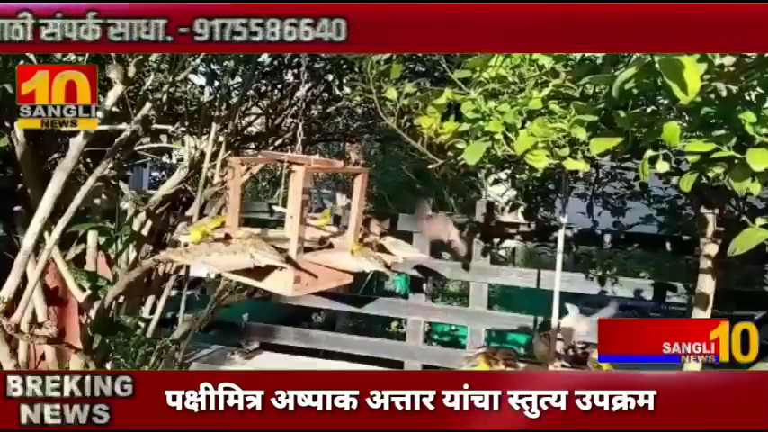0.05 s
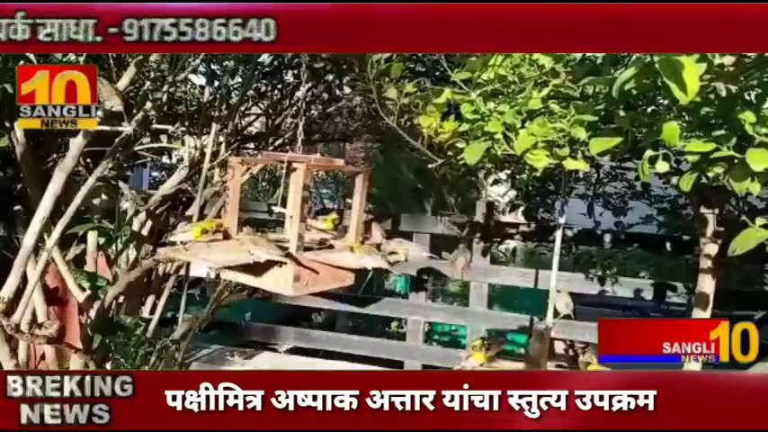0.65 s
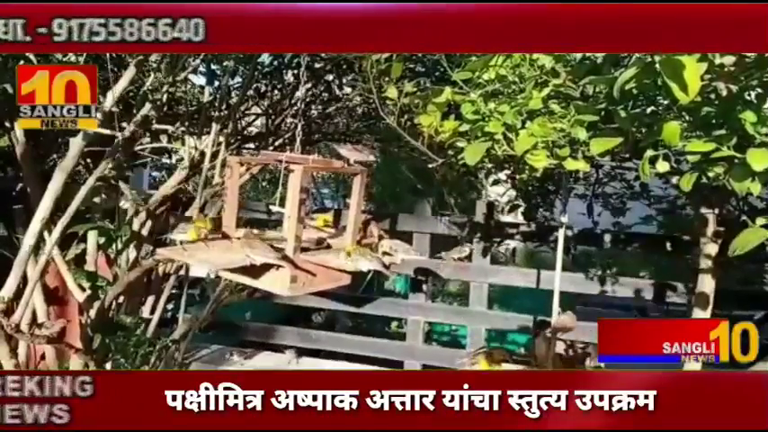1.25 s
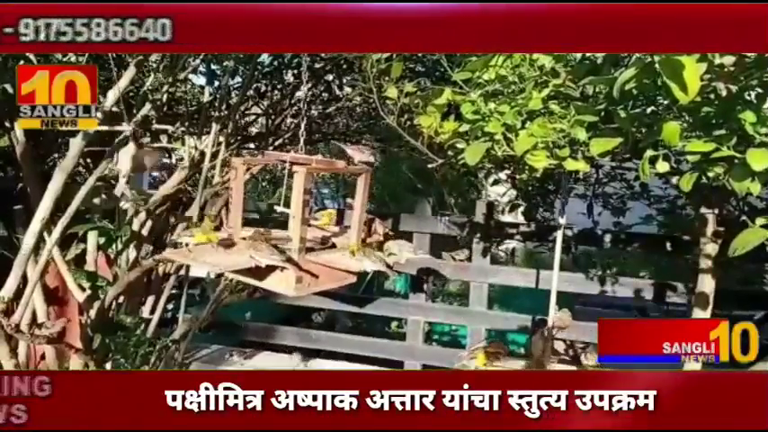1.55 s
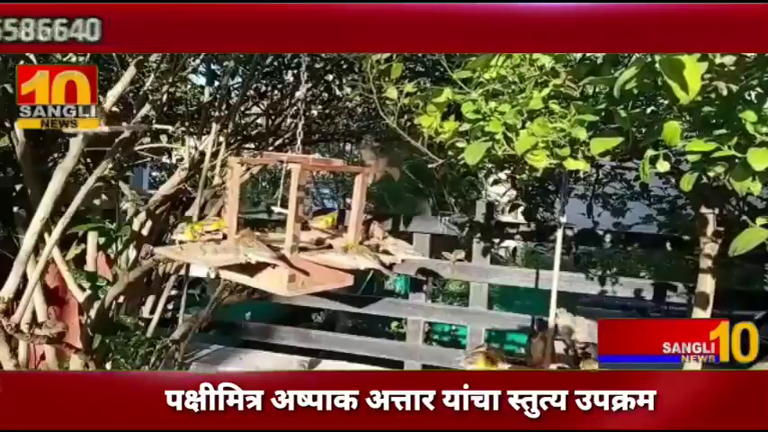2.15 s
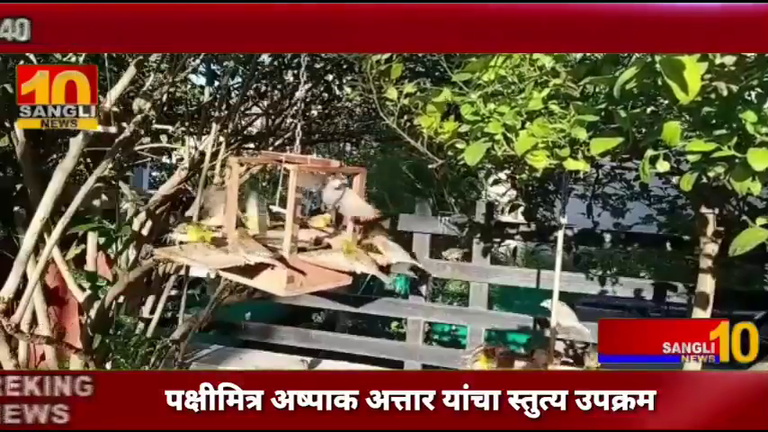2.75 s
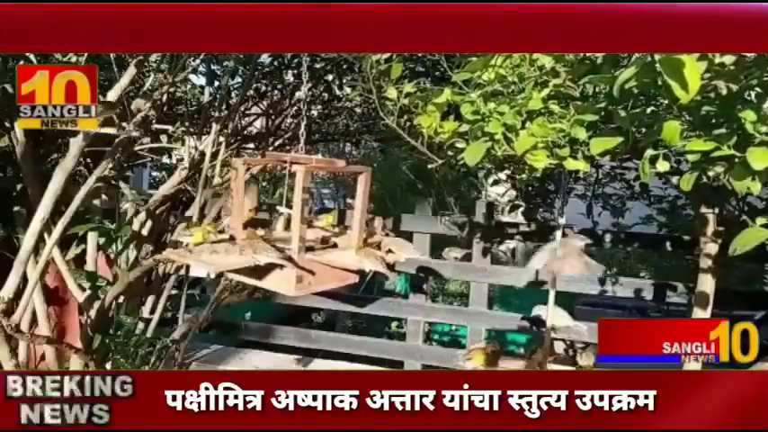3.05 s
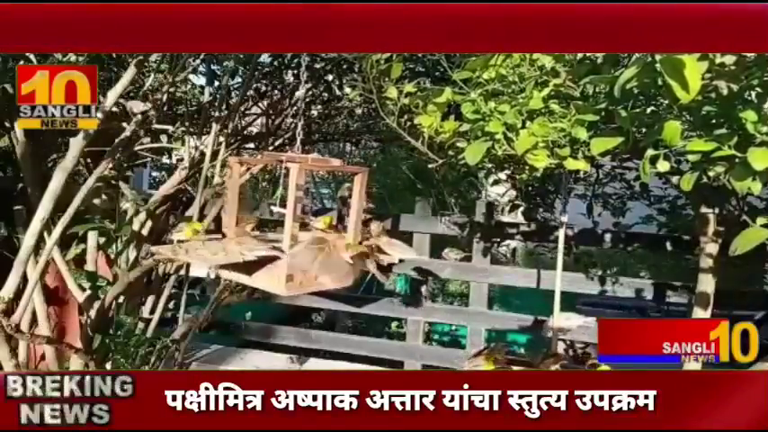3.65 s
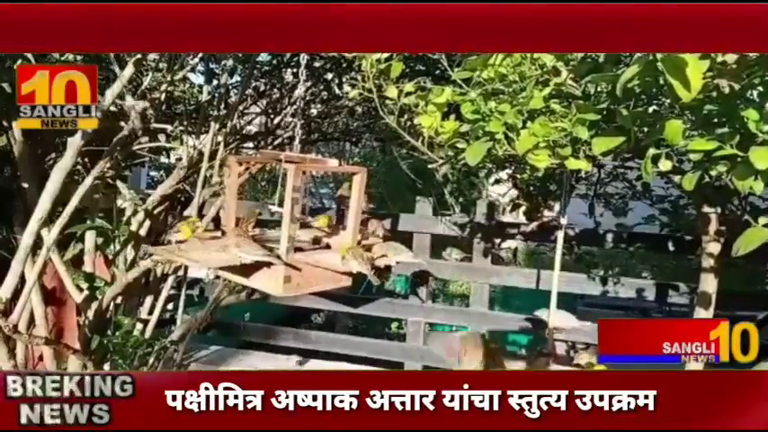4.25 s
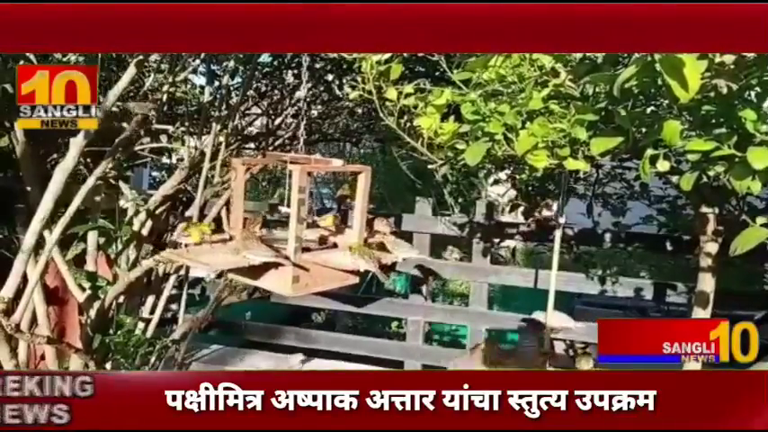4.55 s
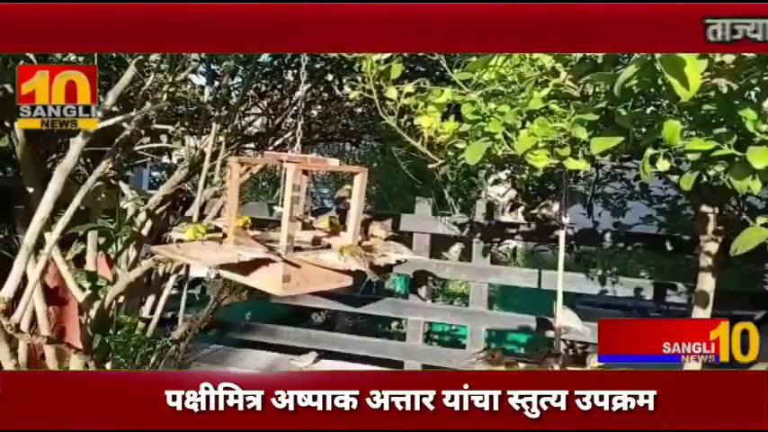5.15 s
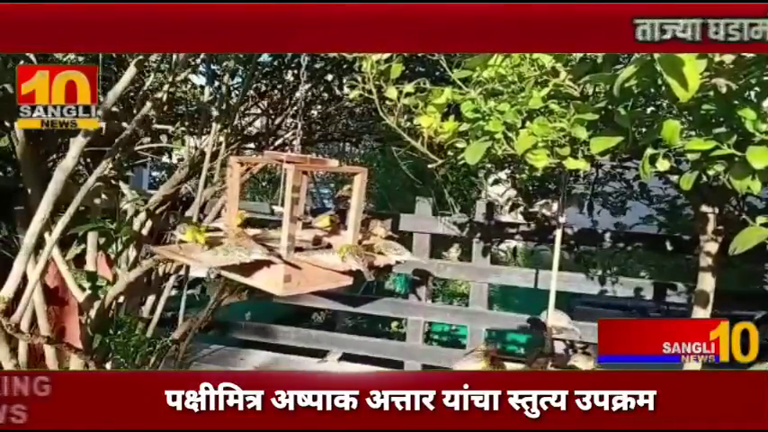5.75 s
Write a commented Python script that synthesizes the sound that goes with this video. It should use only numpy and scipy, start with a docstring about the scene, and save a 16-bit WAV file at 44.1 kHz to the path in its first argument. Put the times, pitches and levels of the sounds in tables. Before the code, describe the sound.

Small birds squabble at a garden feeder, heard from fairly near and straight ahead. They open with harsh rasps and trills, ease into softer falling chirps, then quarrel again. Seed husks snap crisply past the middle, three sharp calls follow, and the chatter ends at its loudest. Soft wing flutters and faint distant whistles sit over a quiet hush of leaves.

```python
"""Weaver birds squabble at a garden feeder. Over a hush and the whistles of far birds, the scene opens with
rasps and trills, tones of the syrinx made harsh by modulation, and wings that push puffs of air.
Softer down-slurs follow, and from 2.4 s the quarrel grows. Near 3.5 s beaks crack seed, each husk ringing
briefly; three sharp chacks come next, and from 4.6 s slurs, chips and rasps crowd in at their loudest.
Throughout, the feeder, ground, fence and walls reflect the calls and clicks."""
import sys
import numpy as np
from scipy import signal
from scipy.fft import rfft, irfft
from scipy.io import wavfile
from scipy.ndimage import uniform_filter1d

SR = 44100
rng = np.random.default_rng(int(sys.argv[2]) if len(sys.argv) > 2 else 0)


def unload_audio(sound):
    """Save the sound as a 16-bit wav file, at the path given as the first command line argument."""
    columns = np.transpose(np.atleast_2d(sound))
    # keep every value between -1 and 1, then stretch to whole-number steps
    steps = np.round(np.clip(columns, -1, 1) * 32767)
    wavfile.write(sys.argv[1], SR, steps.astype(np.int16))


N = 263718

# Levels in the tables are relative: filters and mixing gains act on them later.
# hush of leaves and distance: frequency_hz, density_db
HUSH_SPECTRUM = [(100, -12.5), (170, -10.5), (300, -7.5), (600, -11), (1100, -3), (1650, -8), (2100, -15),
                 (3500, -11), (5000, -14), (7000, -12.5), (9000, -31), (11500, -30.5), (14000, -13.5),
                 (15800, -25)]
# course of the hush: time_s, level_db
HUSH_LEVELS = [(0.0, -60.5), (0.37, -56.5), (0.6, -63), (3.51, -58), (4.38, -62), (5.11, -59),
               (5.98, -59.5)]
# likeness of the hush left and right: frequency_hz, coherence
HUSH_COHERENCE = [(50, 0.72), (250, 0.99), (600, 0.99), (1200, 0.59), (2500, 1), (15000, 1)]
# stirring air: frequency_hz, density_db
AIR_SPECTRUM = [(15, -56), (25, -29), (52, -7), (75, 6), (140, -3), (173, -6), (227, -48), (300, -28),
                (390, -68), (660, -120)]
# course of the stirring air: time_s, level_db
AIR_LEVELS = [(0.0, -64), (0.3, -65), (2.51, -70), (2.65, -73), (4.15, -64.5), (4.35, -56.5), (5.18, -59.5),
              (5.63, -63), (5.98, -55)]
# reverberation of the garden: frequency_hz, t60_s
GARDEN_DECAY = [(200, 0.12), (1000, 0.76), (3500, 0.37), (7000, 0.6), (15000, 0.38)]
# reflections from feeder roof, tray, ground and fence: delay_s, gain_db
REFLECTIONS = [(.0013, -43), (.0034, -18), (.0068, -12.5), (0.01, -10), (0.02, -13), (0.029, -12.5)]
# rightward lean of the surroundings: frequency_hz, left_minus_right_db
BALANCE = [(300, 0.5), (700, -3.5), (1300, -10), (2400, -4)]
# distant whistles: start_s, length_s, level_db, start_hz, end_hz
FAR_WHISTLES = [(0, 0.066, -52, 1143, 1130), (.243, 0.32, -55, 1281, 1075), (.86, 0.098, -60.5, 1161, 1049),
                (.897, 0.092, -60.5, 2177, 2070), (1.045, 0.13, -56, 997, 999),
                (1.775, .062, -65, 1268, 1200), (1.863, 0.14, -60, 1600, 1756),
                (2.18, 0.32, -64.5, 1160, 955), (3.05, 0.25, -58.5, 1295, 1065),
                (3.3, 0.1255, -52, 1060, 1230), (3.56, 0.186, -68, 1140, 1190),
                (4.026, 0.086, -62, 1200, 1300), (5.48, 0.078, -50.5, 734, 714),
                (5.596, .11, -59.5, 976, 1017), (5.837, 0.058, -54.5, 712, 683)]
# birds flying past: start_s, length_s, peak_db
FLYBYS = [(0.164, 0.16, -49), (1.294, 0.1356, -61), (1.661, 0.31, -62.5), (3.424, 0.182, -58.5),
          (3.693, 0.058, -58), (4.249, 0.144, -60), (4.491, 0.26, -48.5), (4.869, 0.72, -57.5)]
# feathers rubbing as birds land and jostle: start_s, length_s, level_db, centre_hz
FEATHER_SCUFFS = [(.279, 0.038, -55.5, 320), (1.135, 0.094, -63.5, 680), (1.741, 0.056, -57, 1190),
                  (2.502, 0.083, -51, 856), (3.32, 0.12, -59, 127), (3.533, 0.073, -56, 600),
                  (4.155, 0.084, -55.5, 580), (4.66, 0.1, -59, 143.5), (5.124, 0.073, -65, 315),
                  (5.462, 0.085, -61, 308)]
# husks snapping: start_s, level_db, ring_hz, t60_s
SEED_CRACKS = [(0.6865, -36, 6340, 0.023), (1.033, -39, 6850, 0.017), (2.101, -41, 3880, 0.018),
               (2.196, -37, 14000, .02), (2.417, -26, 13500, .027), (3.36, -19, 14200, .01),
               (3.401, -16.5, 6900, 0.0054), (3.4848, -18, 5960, 0.054), (3.5802, -17.5, 7000, 0.0057),
               (3.6232, -25.5, 14500, 0.023), (3.703, -29.5, 15200, 0.12), (4.458, -35, 6400, 0.035),
               (4.488, -21, 15200, 0.017), (5.7352, -26.5, 3605, 0.048)]
# colour of breath and of cracking husks: frequency_hz, gain_db
HISS_SPECTRUM = [(300, -14), (1000, -7), (2000, -6), (3500, -7), (7000, -4), (9000, -9), (11500, -6),
                 (13000, 3), (14800, 9), (15800, 8)]
# tone colour of the calls (full middle, dip near 9 kHz, bright top): frequency_hz, gain_db
VOICE_COLOUR = [(500, -28), (1200, -1), (1800, -7), (2300, -4), (4500, -0.5), (6800, -3), (8000, -10.5),
                (9300, -18.5), (11500, -13), (14500, 3)]
# short clear chips: start_s, length_s, level_db, top_hz
CHIP_NOTES = [(0.446, 0.017, -31, 3510), (1.001, 0.015, -55, 3660), (2.849, 0.02, -27, 4970),
              (3.102, 0.024, -33.5, 4520), (3.115, 0.035, -30.5, 3670), (3.249, 0.016, -29.5, 4710),
              (4.797, .016, -15.5, 5600), (4.863, 0.01, -18, 3616), (5.247, 0.028, -19, 4050),
              (5.351, 0.0209, -19.5, 3794), (5.485, 0.024, -29, 3950), (5.535, 0.019, -26.5, 3870),
              (5.762, 0.013, -24.5, 3830), (5.814, 0.0165, -20.5, 6320), (5.821, 0.021, -24.5, 3970)]
# lone sharp chacks: start_s, level_db, top_hz
CHACK_CALLS = [(3.986, -28, 3253), (4.305, -27.5, 3520), (4.58, -24.5, 3750)]
# whistled down-slurs: start_s, length_s, level_db, top_hz, end_hz, following_trill_s
SLUR_CALLS = [(1.354, 0.041, -35, 4360, 3320, 0), (1.489, 0.056, -30.5, 4350, 3574, 0),
              (1.655, 0.045, -35.5, 4450, 3430, 0), (2.525, .04, -23.5, 3920, 2347, 0),
              (3.137, 0.055, -29.5, 4670, 2694, 0), (4.62, 0.038, -21, 5020, 2338, .071),
              (4.805, 0.039, -21.5, 5300, 2740, .083), (4.826, 0.035, -23, 7160, 5280, 0),
              (5.006, 0.044, -21, 5500, 2480, .056), (5.108, 0.016, -16.5, 4060, 2800, 0),
              (5.259, 0.023, -21.5, 4100, 2630, .06)]
# sinking trills: start_s, length_s, level_db, top_hz, overtone_db
TRILL_NOTES = [(0.265, .054, -23.5, 3593, -2), (0.37, 0.075, -33, 3550, -29),
               (0.657, 0.025, -50, 2265, -28), (1.497, 0.058, -32.5, 2750, -3),
               (1.658, 0.055, -37.5, 2770, -7), (2.247, 0.059, -51.5, 3550, -30),
               (2.697, .048, -27.5, 4190, -11.5), (2.732, 0.06, -25.5, 4150, -14),
               (2.983, .05, -29, 3356, -7), (4.744, 0.048, -21.5, 3070, -7)]
# harsh rasps: start_s, length_s, level_db, top_hz, overtone_db, roughness
RASP_CALLS = [(0.113, 0.038, -28.5, 3220, -0.5, 0.63), (0.204, 0.043, -29, 3640, -10, 0.56),
              (0.225, 0.046, -23, 3302, -3, 0.56), (0.318, 0.039, -24.5, 3853, -10, 0.6),
              (0.482, 0.03, -25.5, 3573, 0, .62), (1.148, 0.029, -50, 3220, -1, 0.6),
              (1.286, .046, -33, 2890, -7, .46), (1.377, 0.061, -32.5, 3506, -9, 0.56),
              (1.466, 0.027, -31.5, 2917, -6, 0.54), (1.597, 0.012, -39.5, 3030, 3, 1.1),
              (1.733, 0.027, -42.5, 2885, -4, 1.07), (1.938, 0.0224, -46, 3336, -6, .65),
              (2.414, 0.0208, -32, 3750, -15, .45), (2.436, .085, -29.5, 3726, -7.5, 0.76),
              (2.622, 0.036, -26.5, 3423, -13.5, 0.61), (2.86, 0.072, -24.5, 3640, -3.5, 0.58),
              (3.017, 0.037, -29, 3446, 8, 0.34), (3.105, 0.048, -29, 3050, -5.5, 0.33),
              (3.255, 0.064, -28, 3373, 4, 0.7), (3.312, 0.12, -44, 3470, 4, 1.2),
              (4.963, 0.046, -19, 4264, -7, 0.44), (5.12, 0.027, -27, 3490, 14, .95),
              (5.148, 0.029, -20, 3475, -1, 0.39), (5.17, 0.075, -26, 3860, -5.5, 0.76),
              (5.372, 0.016, -22.5, 3900, -5.5, 0.69), (5.493, 0.053, -30.5, 3384, -5, 0.45),
              (5.771, 0.048, -21, 4065, 0, .56)]

# Note shapes; ratios are to the top pitch, and top_place is a share of the note's length:
# start_ratio, end_ratio, top_place, trill_hz, trill_depth, roughness
CHIP_SHAPE = (0.94, 0.946, 0.545, 114, 0.037, 0.16)
CHACK_SHAPE = (0.72, 0.92, 0.667, 103, 0.052, 0.29)
TRILL_SHAPE = (0.98, 0.84, 0.1565, 68, 0.1782, 0.28)
LEAD_IN_SHAPE = (0.72, 0.84, 0.92, 105, 0.0098, 0.41)
RASP_SHAPE = (0.9, 0.82, 0.379, 72, 0.0775)  # each call adds its roughness
SLUR_SHAPE = (0.1052, 80, 0.042, 0.28)  # each call supplies the two ratios

BAND_EDGE_HZ = 15520


def gain_of(db):
    """The decibel law: 20 dB is a factor of ten in amplitude."""
    return 10 ** (np.asarray(db) / 20)


def unit_rms(x):
    """Normalisation to unit mean power."""
    return x / np.sqrt(np.mean(x ** 2) + 1e-20)


def at_frequency(points, hz):
    """Interpolation of a table on a logarithmic frequency axis."""
    table_hz, value = np.transpose(points)
    return np.interp(np.log(hz + 1), np.log(table_hz + 1), value)


def over_time(points):
    """Linear interpolation of a table at every sample."""
    return np.interp(np.arange(N) / SR, *np.transpose(points))


def add(mix, start_s, sound):
    """Superposition: a sound sums into the mix from start_s on."""
    part = mix[max(round(start_s * SR), 0):][:len(sound)]
    part += sound[:len(part)]


def coloured(x, points):
    """Linear filtering: the spectrum is multiplied by a gain curve."""
    return irfft(rfft(x) * gain_of(at_frequency(points, np.fft.rfftfreq(N, 1 / SR))), N)


def noise(spectrum):
    """Spectral shaping of white noise, at unit power."""
    return unit_rms(coloured(rng.standard_normal(N), spectrum))


def wander(cutoff_hz):
    """Low-pass filtered noise: a smooth random fluctuation of unit power."""
    rolloff = 1 + (np.fft.rfftfreq(N, 1 / SR) / cutoff_hz) ** 4
    return unit_rms(irfft(rfft(rng.standard_normal(N)) / rolloff, N))


def fade(t, length_s, rise_s, fall_s):
    """An amplitude envelope with sine-squared attack and release."""
    attack = np.sin(np.pi / 2 * np.clip(t / rise_s, 0, 1)) ** 2
    release = np.sin(np.pi / 2 * np.clip((length_s - t) / fall_s, 0, 1)) ** 2
    return attack * release


def hush(patch_db=3.2):
    """Partial coherence: leaves and distance give a patchy noise, largely alike left and right."""
    frames, hz = N // 256 + 5, np.fft.rfftfreq(1024, 1 / SR)
    a, b, c, d, patches = rng.standard_normal((frames, len(hz), 5)).T
    left, independent = a + 1j * b, c + 1j * d
    coherence = np.clip(at_frequency(HUSH_COHERENCE, hz), -1, 1)[:, None]
    right = coherence * left + np.sqrt(1 - coherence ** 2) * independent
    patches = uniform_filter1d(patches, size=7, axis=0)  # smooth across frequency, then time
    patches = unit_rms(uniform_filter1d(patches, size=14, axis=1))
    colour = gain_of(at_frequency(HUSH_SPECTRUM, hz)[:, None] + patch_db * patches)
    stereo = signal.istft(np.array([left, right]) * colour, nperseg=1024, noverlap=768)[1][:, :N]
    return gain_of(over_time(HUSH_LEVELS) + 2) * unit_rms(stereo)


def stirring_air(gust_hz=2, gust_db=2.5):
    """Slow amplitude modulation: small gusts swell a low rumble."""
    return gain_of(over_time(AIR_LEVELS) - 1 + gust_db * wander(gust_hz)) * noise(AIR_SPECTRUM)


def garden_reverb(x):
    """Scattering from leaves and walls: dense echoes decay exponentially, each band at its own rate."""
    taps = np.zeros(SR)
    slots = np.arange(SR // 100, SR - 20, 20)
    taps[slots + rng.integers(0, 20, len(slots))] = rng.choice([-1., 1.], len(slots))
    hz, t, spectra = signal.stft(taps, SR, nperseg=256)
    decay = gain_of(-60 * t / at_frequency(GARDEN_DECAY, hz)[:, None])
    tail = signal.istft(spectra * decay, SR, nperseg=256)[1]
    return signal.fftconvolve(x, tail / np.linalg.norm(tail))[:N]


def far_birds(octave_db=-14, waver=0.024, flutter_db=3):
    """Random modulation: low two-harmonic whistles waver in pitch and level."""
    out, drift = np.zeros(N), wander(34)
    flutter = gain_of(flutter_db * wander(25))
    for start_s, length_s, level_db, start_hz, end_hz in FAR_WHISTLES:
        t = np.arange(int(length_s * SR)) / SR
        hz = np.linspace(start_hz, end_hz, len(t)) * (1 + waver * drift[round(start_s * SR):][:len(t)])
        phase = 2 * np.pi * np.cumsum(hz) / SR
        tone = np.sin(phase) + gain_of(octave_db) * np.sin(2 * phase)
        add(out, start_s, gain_of(level_db) * unit_rms(tone * fade(t, length_s, 0.0073, 0.025)))
    return out * unit_rms(flutter)


def wing_strokes(rate_hz=25, stroke_s=0.073, push_hz=79, spread_octaves=0.17, edge_db=-9):
    """Periodic pushes of air swell as a bird nears and fade as it leaves; yields rows like the scuffs."""
    for start_s, length_s, peak_db in FLYBYS:
        for t in np.arange(0, length_s - stroke_s / 2, 1 / rate_hz):
            away = (2 * t + stroke_s) / length_s - 1
            centre_hz = push_hz * 2 ** (spread_octaves * rng.standard_normal())
            yield start_s + t, stroke_s, peak_db + edge_db * away ** 2, centre_hz


def wings(half_width_octaves=0.67):
    """Band-limited noise bursts: low for displaced air, higher for the friction of feathers."""
    out, size = np.zeros(N), SR // 4
    octaves = np.log2(np.fft.rfftfreq(size, 1 / SR) + 1)
    for start_s, length_s, level_db, centre_hz in FEATHER_SCUFFS + list(wing_strokes()):
        rolloff = 1 + ((octaves - np.log2(centre_hz)) / half_width_octaves) ** 4
        puff = irfft(rfft(rng.standard_normal(size)) / rolloff, size)[:int(length_s * SR)]
        add(out, start_s, gain_of(level_db) * unit_rms(puff * np.hanning(len(puff))))
    return out


def pecks(ring_width_hz=2400, crack_db=-3):
    """Impulsive excitation: a husk snaps, and its crack and broad resonance decay exponentially."""
    out, t = np.zeros(N), np.arange(SR // 10) / SR
    crack, ring = noise(HISS_SPECTRUM), wander(ring_width_hz / 2)
    for start_s, level_db, ring_hz, t60_s in SEED_CRACKS:
        span = round(start_s * SR) + np.arange(len(t))
        snap = ring[span] * np.sin(2 * np.pi * ring_hz * t) + gain_of(crack_db) * crack[span]
        add(out, start_s, gain_of(level_db - 6 - 60 * t / t60_s) * snap)
    return out


def flock_notes(count=26, length_s=0.045, level_db=-66.5, spread_db=2.5, top_hz=3940, octaves=0.3):
    """A random point process: the rest of the flock chips faintly in the trees."""
    starts = rng.uniform(0, N / SR - 2 * length_s, count)
    for start_s, (loud, high) in zip(starts, rng.standard_normal((count, 2))):
        pitch_hz = top_hz * 2 ** (octaves * high)
        yield start_s, length_s, level_db + spread_db * loud, pitch_hz, -15.5, CHIP_SHAPE


def weaver_notes(chack_s=0.0143, lead_s=0.018, overlap_s=0.00862, lower=0.9, run_on_hz=3110):
    """Calls are sequences of notes; yields start_s, length_s, level_db, top_hz, overtone_db, shape."""
    for note in CHIP_NOTES:
        yield *note, -15.5, CHIP_SHAPE
    for start_s, level_db, top_hz in CHACK_CALLS:  # faint lead-in, sharp chip, harsh snap
        yield start_s - 0.021, chack_s, level_db - 15.5, top_hz * lower, -2, LEAD_IN_SHAPE
        yield start_s, chack_s, level_db, top_hz, -7.5, CHACK_SHAPE
        yield start_s + 0.009, chack_s, level_db - 6, top_hz * lower, -2, (*RASP_SHAPE, 0.54)
    for start_s, length_s, level_db, top_hz, end_hz, trill_s in SLUR_CALLS:
        yield start_s, length_s, level_db, top_hz, -7.5, (1, end_hz / top_hz, *SLUR_SHAPE)
        if trill_s > 0:
            yield start_s + length_s, trill_s, level_db - 0.7, run_on_hz, -3, TRILL_SHAPE
    for note in TRILL_NOTES:
        yield *note, TRILL_SHAPE
    for start_s, length_s, level_db, top_hz, overtone_db, rough in RASP_CALLS:
        # a rasp swells out of a softer, lower, rising note
        yield start_s - lead_s, lead_s + overlap_s, level_db - 8, top_hz * lower, -2, LEAD_IN_SHAPE
        yield start_s, length_s, level_db, top_hz, overtone_db, (*RASP_SHAPE, rough)
    yield from flock_notes()


def weavers(buzz_index=1.86, buzz_chop=0.6, trill_octaves=0.25, rise_s=0.0041, fall_s=0.00793):
    """Modulation makes sidebands: the syrinx's second side splits an arched whistle into a harsh stack."""
    voice, breath = np.zeros(N), np.zeros(N)
    fluctuations = np.array([wander(hz) for hz in (40, 300, 400, 90)])
    for start_s, length_s, level_db, top_hz, overtone_db, shape in weaver_notes():
        start_ratio, end_ratio, top_place, trill_hz, trill_depth, rough = shape
        rough = np.clip(rough, 0, 1)
        t = np.arange(int((length_s + fall_s / 2) * SR)) / SR
        drift, jitter, flicker, slip = fluctuations[:, round(start_s * SR):][:, :len(t)]
        progress = t / t[-1]
        climb = np.clip(1 - progress / top_place, 0, 1)
        drop = np.clip((progress - top_place) / (1 - top_place), 0, 1)
        arch_hz = top_hz * (1 + (start_ratio - 1) * climb ** 2 + (end_ratio - 1) * drop ** 1.2)
        # each note trills at its own uneven rate: a quick jump up, then a louder slide down
        beat_hz = trill_hz * 2 ** (trill_octaves * drift[0]) * (1 + 0.201 * drift)
        beat = 2 * np.pi * np.cumsum(beat_hz) / SR
        hz = arch_hz * (1 + trill_depth * np.sin(beat + np.sin(beat) / 2) + 0.025 * rough * jitter)
        throb = 0.057 * np.tanh(10 * trill_depth) * np.cos(beat)
        # the second oscillator locks loosely to a quarter of the pitch
        buzz = np.sin(2 * np.pi * np.cumsum(hz / 4 * (1 + 0.012 * slip)) / SR)
        phase = 2 * np.pi * np.cumsum(hz) / SR + buzz_index * rough * buzz
        fourth = np.sin(4 * phase) * (4 * hz < SR - BAND_EDGE_HZ)  # muted where it would alias in band
        overtones = np.sin(2 * phase) + gain_of(-12) * (np.sin(3 * phase) + fourth)
        # harsh notes swell more slowly; the tone brightens with pressure
        pressure = fade(t, t[-1], rise_s + 0.016 * rough ** 2, fall_s)
        tone = np.sin(phase) + gain_of(overtone_db) * pressure * overtones
        tone *= 1 + buzz_chop * rough * buzz
        effort = gain_of(level_db) * unit_rms(pressure * np.exp(0.15 * rough * flicker - throb))
        add(voice, start_s, effort * unit_rms(tone))
        add(breath, start_s, effort * (1 + rough) / 2)
    hiss = gain_of(-18) * breath * noise(HISS_SPECTRUM)
    return coloured(voice, VOICE_COLOUR) + hiss


def scene(near_db=-2, near_echo_db=-9, far_db=-4, far_echo_db=-5):
    """Distance and direction cues: the flock is straight ahead; far birds echo more and lie right."""
    near = gain_of(near_db) * (weavers() + pecks())
    far = far_birds()
    centre = near + garden_reverb(gain_of(near_echo_db) * near)
    for delay_s, gain_db in REFLECTIONS:
        add(centre, delay_s, gain_of(gain_db) * near)
    around = hush() + stirring_air()
    around += gain_of(far_db) * far + garden_reverb(gain_of(far_echo_db) * far) + wings()
    left = coloured(around[0], [(hz, db / 2) for hz, db in BALANCE])
    right = coloured(around[1], [(hz, -db / 2) for hz, db in BALANCE])
    return centre + np.array([left, right])


def record(dry):
    """Band limiting: a steep low-pass filter removes the highest treble."""
    lowpass = signal.firwin(511, BAND_EDGE_HZ, window=("kaiser", 9), fs=SR)
    return signal.oaconvolve(dry, lowpass[None], "same")


dry = scene()
out = record(dry)
unload_audio(out)
```